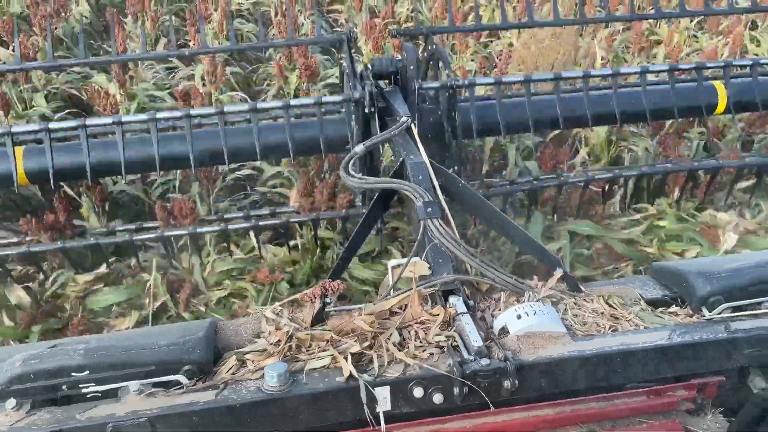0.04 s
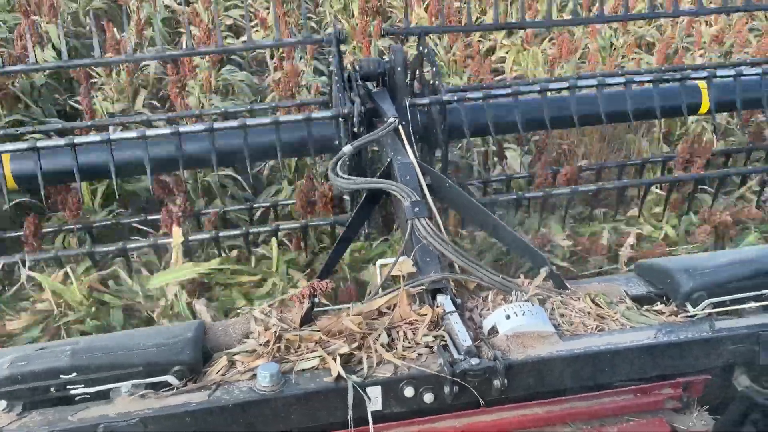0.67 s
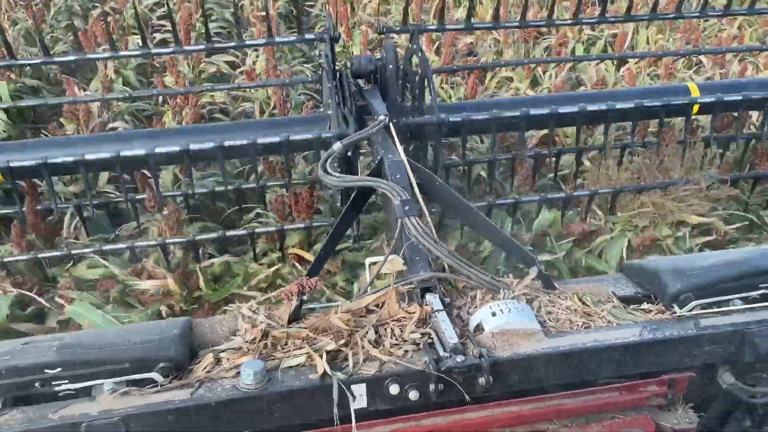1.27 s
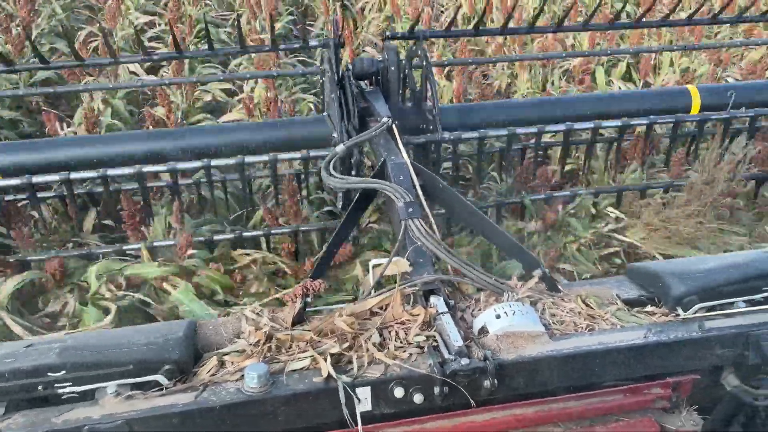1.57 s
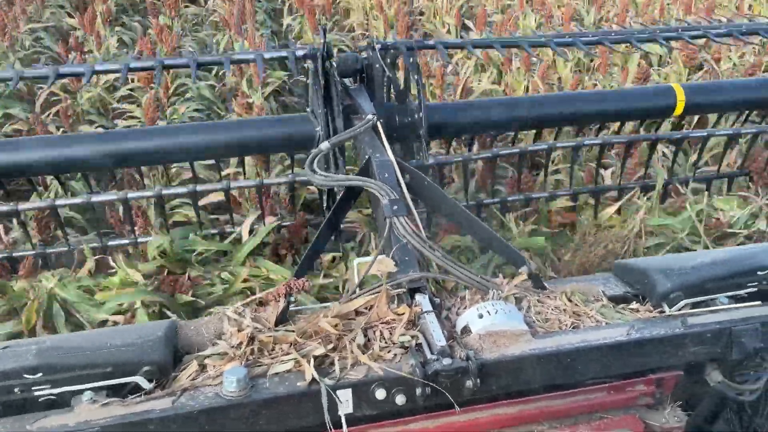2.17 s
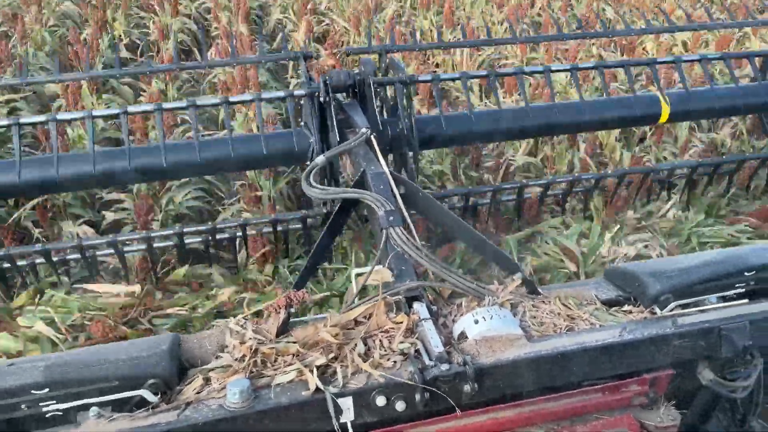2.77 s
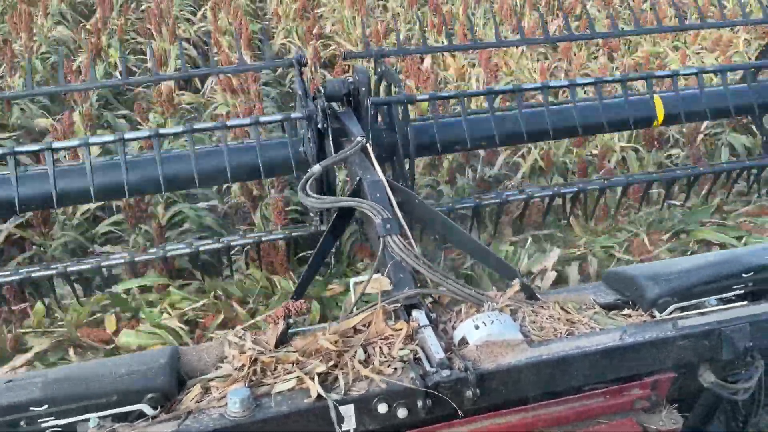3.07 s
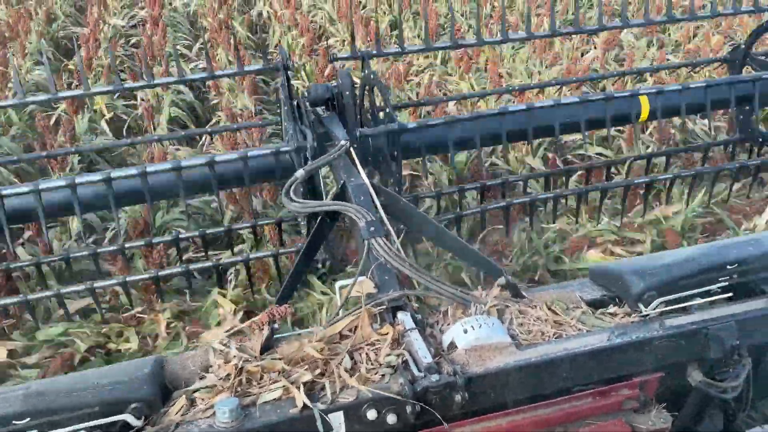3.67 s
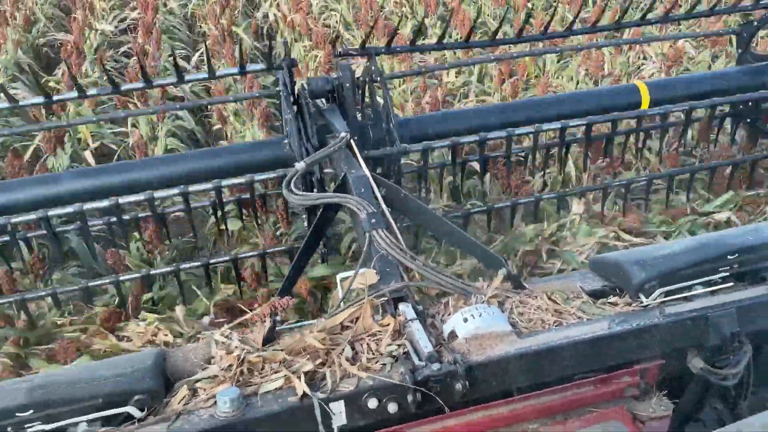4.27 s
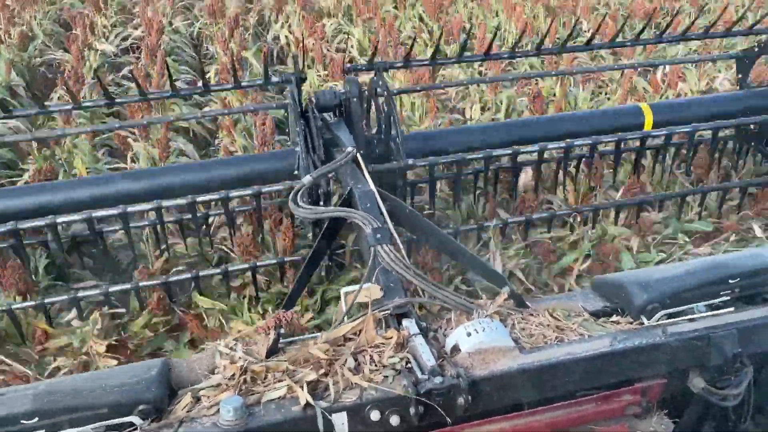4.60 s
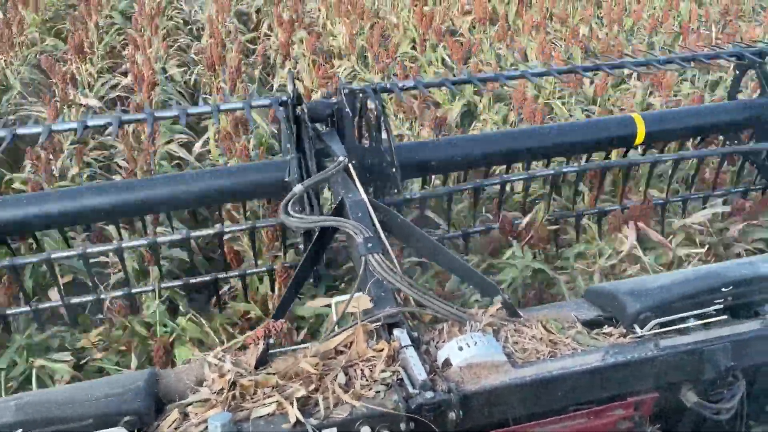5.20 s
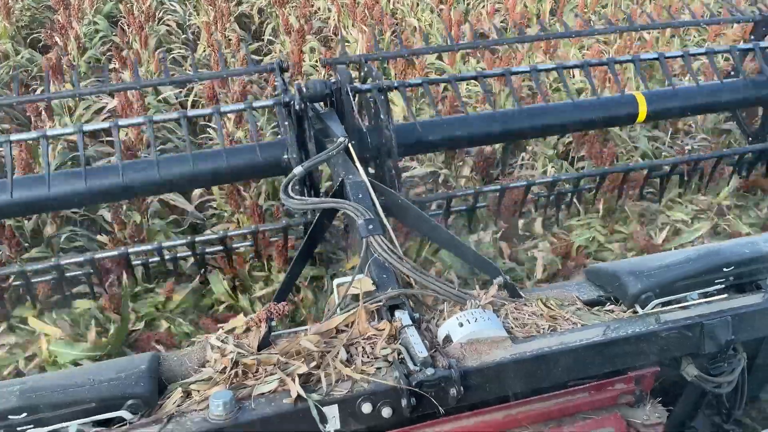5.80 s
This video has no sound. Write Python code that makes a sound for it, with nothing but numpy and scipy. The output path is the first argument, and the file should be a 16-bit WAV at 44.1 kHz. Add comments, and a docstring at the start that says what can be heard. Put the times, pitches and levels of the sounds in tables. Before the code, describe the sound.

Inside a harvester's closed cab, a low throbbing engine drone and the rumble of crop passing through the machine run throughout. A soft vent hiss sits close to the microphone, with a wavering hum and a thin gear whine. From out front come scattered muffled crunches and metallic knocks of stalks, clearest about two seconds in and again past the middle, along with faint ticks and squeaks from the reel.

```python
"""Inside the closed cab of a combine harvester cutting sorghum at a steady speed, stereo microphone.
Close by, the air vents hiss and the cab panels rumble with the crop passing through the machine.
The diesel's firing and the threshing drum's beat drone on top; gears, shafts and a pump whine,
and a belt groans now and then. Out front, beyond the glass, stalks snap, swish and knock in the
steel header, whose reel ticks, rattles and squeaks faintly."""
import sys
import numpy as np
from scipy import signal
from scipy.fft import rfft, irfft, next_fast_len
from scipy.io import wavfile
from scipy.ndimage import uniform_filter1d, map_coordinates

SR = 44100
rng = np.random.default_rng(int(sys.argv[2]) if len(sys.argv) > 2 else 0)


def master(y):
    """Save y as 16-bit WAV."""
    cut = np.clip(np.atleast_2d(y).T, -1, 1)
    pcm = np.round(cut * 32767)  # scale
    wavfile.write(sys.argv[1], SR, pcm.astype(np.int16))


N = 266716
CONTACT_S = .00091  # rise time of a blow on steel


def amp(db):
    return 10 ** (np.asarray(db) / 20)


def unit(x):
    return x / np.sqrt(np.mean(x ** 2) + 1e-20)


def clock():
    return np.arange(N) / SR


def along(points, hz):
    """Read (Hz, value) points on a log frequency axis."""
    freqs, values = np.transpose(points)
    return np.interp(np.log(hz + 1), np.log(freqs + 1), values)


def curve(points):
    """Read (seconds, value) points at every sample."""
    return np.interp(clock(), *np.transpose(points))


def wobble(rate):
    """A smooth random curve, rate knots a second."""
    coarse = clock()[::32]
    knots = rng.standard_normal(4096)
    return np.interp(clock(), coarse, map_coordinates(knots, [coarse * rate], mode="wrap"))


def filtered(x, response):
    """Apply a gain given as a function of Hz."""
    size = next_fast_len(N + 8192, True)
    return irfft(rfft(x, size) * response(np.fft.rfftfreq(size, 1 / SR)), size)[..., :N]


def cab_noise(gain):
    """Stereo noise of rms 1 at the microphone: alike on both sides in the bass, diffuse higher up."""
    # Each row: frequency in Hz, side over mid in dB.
    width = [(60, -28.5), (97, -32), (160, -19), (260, -1.5), (420, -4.5), (680, -1), (1100, 1), (1790, -4),
             (2910, -5), (4730, -11), (7690, 14.5), (12500, -26.5)]
    # Each row: frequency in Hz, left over right in dB.
    lean = [(60, -2.5), (110, 3), (200, 0.5), (360, 2), (640, 0.5), (1160, 1), (2110, 2.5), (3810, 5),
            (6900, 0), (12500, 0.5)]

    def mid_side_gain(hz):
        spread = amp(along(width, hz))
        return gain(hz) * np.array([np.ones_like(hz), spread]) / np.hypot(1, spread)

    mid, side = filtered(rng.standard_normal((2, N)), mid_side_gain)
    left_right = np.array([mid + side, mid - side])
    return unit(filtered(left_right, lambda hz: amp(np.outer([.5, -.5], along(lean, hz)))))


def shaped(spectrum):
    """Cab noise with a (Hz, dB) spectrum."""
    return cab_noise(lambda hz: amp(along(spectrum, hz)))


def resonances(modes, hz):
    """The gain of (centre Hz, width Hz, dB) resonances."""
    return sum(amp(db) / (1 + (2 * (hz - centre) / width) ** 2) for centre, width, db in modes)


def ringing(modes):
    """Cab noise in a few resonances."""
    return cab_noise(lambda hz: resonances(modes, hz))


def patchy(x, depth_db):
    """Let each band surge on its own, in random patches about a tenth of a second long."""
    spectra = signal.stft(x, nperseg=1024)[2]
    patches = rng.standard_normal(spectra.shape[1:])
    patches = uniform_filter1d(uniform_filter1d(patches, 5, axis=0), 9, axis=1)
    return unit(signal.istft(spectra * amp(depth_db * unit(patches)), nperseg=1024)[1][:, :N])


def tone(phase, db, lean_db, lead):
    """A sine placed by the cab's standing waves: the left is lean_db louder and lead radians ahead."""
    sides = np.array([[.5], [-.5]])
    start_phase = rng.uniform(0, 2 * np.pi)
    return np.sqrt(2) * amp(db + sides * lean_db) * np.sin(phase + sides * lead + start_phase)


def spin(hz, drift):
    """Phase of a rotation whose speed wanders by the share drift."""
    return 2 * np.pi * np.cumsum(hz * (1 + drift * wobble(1.912))) / SR


def swell(t, length):
    """An envelope that peaks at t = 0 and dies more slowly than it rises."""
    u = np.clip(t / length * 2, -6, 60)
    return np.exp((1 - u - np.exp(-u)) / 2)


def bursts(rows):
    """The joint envelope of (peak time s, dB, length s) swells, added in power."""
    t = clock()[::16]
    power = sum((amp(db) * swell(t - s, length)) ** 2 for s, db, length in rows)
    return np.interp(clock(), t, np.sqrt(power))


def placed(sound, start_s):
    """Set a short stereo sound into silence."""
    start = max(0, round(start_s * SR))
    out = np.zeros((2, N + SR))
    out[:, start:start + sound.shape[1]] = sound
    return out[:, :N]


def vents():
    """Cooling air hisses in the cab, close to the microphone."""
    # Each row: frequency in Hz, relative level in dB.
    hiss = [(1000, -27), (3000, 4.5), (4500, -6.5), (6200, 0), (7500, -6.5), (9500, -8.5), (11500, -14),
            (12800, -20), (15000, -51)]
    return amp(-53.5 + 1.1 * wobble(4.77)) * shaped(hiss)


def ticks(count=150, loudest_db=-45.5, spread_db=8, t60_s=.04, low_hz=2100, high_hz=4000):
    """Grain and stem ends tick against the reel's steel, each with a short ring of its own."""
    t = np.arange(SR // 25) / SR
    out = np.zeros((2, N + len(t)))
    envelope = amp(-60 * t / t60_s) * (1 - np.exp(-t / CONTACT_S))
    for when, pitch, softness, side in rng.uniform(0, 1, (count, 4)):
        hz = low_hz + pitch * (high_hz - low_hz)
        ring = tone(2 * np.pi * hz * t, loudest_db - spread_db * softness, 2, np.pi * (side - .5))
        start = int(when * N)
        out[:, start:start + len(t)] += envelope * ring
    return out[:, :N]


def tine_rattle(peak_s, db, length, hz, scatter_db=1.5, grain_db=3.5, side_db=-6, lean_db=3.5):
    """A loose tine chatters: scratchy contacts excite its steel modes, in a new balance each time."""
    # Each row: multiple of the pitch, width in Hz, relative level in dB.
    tine_modes = [(.8, 453, 3.5), (1, 250, 5), (1.31, 490, -7), (1.6, 445, -4), (1.73, 247, -16)]
    t = np.arange(SR // 4) / SR
    rise_s = 2 * length
    modes = [(k * hz, width, level + scatter_db * rng.standard_normal())
             for k, width, level in tine_modes]
    response = resonances(modes, np.fft.rfftfreq(len(t), 1 / SR))
    mid, side = unit(irfft(rfft(rng.standard_normal((2, len(t)))) * response, len(t)))
    contacts = np.interp(t, np.arange(75) / 300, rng.standard_normal(75))
    sides = np.array([[1], [-1]])
    steel = (mid + sides * amp(side_db) * side) * amp(sides * lean_db / 2)
    chatter = unit(amp(grain_db * contacts) * steel)
    return placed(amp(db) * swell(t - rise_s, length) * chatter, peak_s - rise_s)


def pivot_squeak(peak_s, db, length, hz, glide, roughness=.017, bite_s=.007, grain_db=3):
    """A dry joint slips: the overtones bite first, then a short, rough note takes over."""
    # Each row: harmonic number, relative level in dB, left lead in radians.
    partials = [(1, 0, 1.5), (2, -10.5, 0.14), (3, -15.5, 0.96)]
    glass_hz, glass_loss_db = 6540, 7  # the cab glass dulls overtones above this pitch
    t = np.arange(SR // 6) / SR
    rise_s = 3 * length
    slips, grip = (np.interp(t, np.arange(150) / 900, row) for row in rng.standard_normal((2, 150)))
    phase = 2 * np.pi * np.cumsum(hz * (1 + roughness * slips + glide * (t - rise_s))) / SR
    note = 0
    for k, partial_db, lead in partials:
        envelope = swell(t - rise_s + bite_s * (k > 1), length)
        level_db = db + partial_db - glass_loss_db * (k * hz > glass_hz)
        note += envelope * tone(k * phase, level_db, 2, lead)
    return placed(note * unit(amp(grain_db * grip)), peak_s - rise_s)


def reel():
    """Out on the reel, faint through the glass, loose tines rattle and dry pivots squeak."""
    # Each row: peak time in seconds, level in dB, length in seconds, pitch in Hz.
    rattles = [(0.234, -46.5, 0.04, 3800), (0.502, -47, 0.027, 3830), (1.386, -44, 0.028, 3830),
               (1.597, -47.5, .012, 3760), (1.741, -50, .025, 3620), (2.343, -52.5, 0.024, 3800),
               (2.509, -44.5, 0.029, 3830), (2.707, -47, 0.03, 3950), (3.399, -46, 0.024, 3900),
               (3.692, -45, 0.015, 3660), (4.301, -47, 0.019, 3770), (4.962, -46, 0.016, 3860),
               (5.018, -47.5, .02, 3810), (5.331, -50, 0.011, 3730), (5.411, -49, .035, 3750),
               (5.95, -49, .025, 3830)]
    # Each row: peak time in seconds, pitch in Hz, level in dB, length in seconds,
    # glide as a share of the pitch per second.
    squeaks = [(0.362, 2800, -48, 0.02, .5), (0.596, 2880, -45.5, 0.016, 0),
               (1.514, 3910, -42, 0.0078, -0.87), (1.748, 3010, -44.5, .012, 0),
               (1.897, 3390, -44.5, 0.009, 0.23), (2.168, 3880, -50, .011, 0),
               (2.603, 3100, -48, 0.015, -0.66), (2.85, 3000, -46, 0.017, -1.5),
               (3.8, 3090, -45.5, 0.026, 0.43), (5.464, 3300, -51, .018, 0.26),
               (5.55, 2970, -42, 0.0098, 0.039), (5.688, 3270, -47, 0.017, .8),
               (5.786, 3010, -42.5, 0.009, -0.58)]
    tines = sum(tine_rattle(*row) for row in rattles)
    return tines + sum(pivot_squeak(s, db, length, hz, glide) for s, hz, db, length, glide in squeaks)


def header_knocks(pivot_hz=1500, detune=.005):
    """Hard stalks strike the header's sheet steel; heavier ones drive the low modes more."""
    # Each row: start in seconds, level in dB, weight in dB per octave below pivot_hz.
    knocks = [(.746, -40.5, -6), (2.085, -35.5, 6), (2.094, -33, -0.5), (2.107, -34.5, 3), (2.124, -35, 4),
              (2.138, -41.5, 9), (3.17, -42, 1), (3.836, -42, 0), (4.591, -32, -1.5), (4.6, -34, -1)]
    # Each row: mode frequency in Hz, relative level in dB, seconds to fall by 60 dB.
    sheet_modes = [(651, -2, 0.14), (766, -5.5, 0.17), (867, -8, .12), (1040, -8, 0.051), (1475, 1, 0.05),
                   (1993, -2.5, 0.055), (2134, -1, 0.044), (2580, -7.5, .04), (3180, -9, 0.029),
                   (3770, -11, .05)]
    t = np.arange(SR // 4) / SR
    onset = 1 - np.exp(-t / CONTACT_S)
    out = np.zeros((2, N))
    for start_s, db, weight_db in knocks:
        ring = 0
        for hz, mode_db, t60 in sheet_modes:
            struck_hz = hz * (1 + detune * rng.standard_normal())  # shifts with the place of the blow
            level_db = mode_db + weight_db * np.log2(pivot_hz / hz)
            ring += tone(2 * np.pi * struck_hz * t, level_db, 1.5, rng.normal(0, .72)) * amp(-60 * t / t60)
        out += placed(amp(db) * onset * ring, start_s)
    return out


def stalks():
    """Stems snap, ring the header trough and scrape along it; leaves brush past; wads hit the feeder."""
    # Each row: peak time in seconds, relative level in dB, length in seconds, trough over snap in dB.
    crunches = [(0.753, -33.5, 0.02, 0), (1.058, -42, 0.025, 3), (1.98, -38.5, 0.1, -2.5),
                (2.083, -34, 0.0089, 1), (2.099, -28, 0.014, -9), (2.199, -33.5, 0.015, -18),
                (2.498, -37, 0.013, -4), (2.74, -39.5, 0.051, -9), (3.174, -28.5, 0.021, -4.5),
                (3.838, -33.5, 0.022, 0), (4.162, -45.5, 0.044, 6.5), (4.596, -32, 0.023, -11),
                (4.63, -41, .014, -9), (4.682, -39, .012, 1)]
    # Each row: peak time in seconds, relative level in dB, length in seconds.
    scrapes = [(.26, -42, 0.032), (1.95, -44, 0.031), (2.205, -53, .014), (3.38, -44, 0.062),
               (3.71, -42.5, 0.029), (5.45, -39.5, 0.036), (5.69, -46.5, 0.064)]
    swishes = [(2.77, -51.5, 0.079), (2.85, -54, 0.05), (2.935, -48, 0.024), (3.122, -41.5, 0.02),
               (3.17, -45, 0.033), (3.484, -50.5, 0.009)]
    thuds = [(2.108, -36, 0.021), (2.15, -40, 0.047), (2.728, -32, 0.02), (3.18, -33, 0.0083),
             (3.85, -33.5, 0.015), (4.625, -38, 0.019), (5.19, -35.5, 0.018)]
    # Spectra of the crop. Each row: frequency in Hz, relative level in dB.
    snap_spectrum = [(100, -31), (700, 10.5), (1400, 2.5), (2100, 3.5), (3200, -1.5), (4500, -13),
                     (6000, -14.5), (8000, -25.5), (12000, -38), (16000, -67)]
    leaf_spectrum = [(300, -55), (1500, -28), (3500, 5.5), (6000, 6), (8000, 4), (10500, -3), (12500, -11),
                     (15500, -24.5)]
    small_stem_spectrum = [(800, -25.5), (1800, -1), (3000, 1.5), (4500, -5), (6200, -8), (8000, -34.5),
                           (14000, -49)]
    # Resonances of the steel. Each row: centre in Hz, width in Hz, relative level in dB.
    trough_modes = [(798, 130, -8.5), (1000, 70, 8.5), (1417, 154, 4.5), (1990, 170, 0.5), (2184, 48, 2),
                    (2860, 230, -5.5)]
    scraped_modes = [(2040, 90, 3), (2237, 130, 6.5), (2750, 200, -17), (3460, 120, -7)]
    feeder_modes = [(428, 24, 16), (630, 55, 1.5), (768, 34, 0.5), (1100, 140, 0.5)]
    snaps = [(s, db, length) for s, db, length, _ in crunches]
    rings = [(s, db + ring_db, length) for s, db, length, ring_db in crunches]
    snap = bursts(snaps) * unit(amp(1.9 * wobble(300))) * shaped(snap_spectrum)
    trough = bursts(rings) * ringing(trough_modes)
    stick_slip = unit(amp(-.5 * wobble(200)))
    scrape = bursts(scrapes) * stick_slip * ringing(scraped_modes)
    swish = bursts(swishes) * unit(amp(1.5 * wobble(440))) * shaped(leaf_spectrum)
    grainy_clumps = unit(amp(4 * wobble(22) + 2.5 * wobble(350)))
    crackle = grainy_clumps * shaped(small_stem_spectrum)
    thud = bursts(thuds) * ringing(feeder_modes)
    return amp(-1) * (snap + trough) + scrape + swish + amp(-52.5) * crackle + amp(5) * thud


def belt(groan_hz=406):
    """A loaded belt groans now and then."""
    # Each row: peak time in seconds, level in dB, length in seconds.
    groans = [(.81, -32.5, 0.081), (2.16, -41, .05), (2.48, -35, .06)]
    phase = spin(groan_hz, drift=.008) + .4 * wobble(20)
    return bursts(groans) * tone(phase, 0, 0, .5)


def gearbox(mesh_hz=2030, jitter_rad=.72, flutter_db=3, flicker_db=3):
    """The meshing teeth hold one whine that flickers and flutters; the casing rasps with them."""
    # Each row: time in seconds, level of the whine in dB.
    gear_load = [(0, -57), (.5, -59.5), (.65, -49), (1.3, -54), (1.6, -48.5), (2.0, -52.5), (2.25, -56),
                 (2.4, -47), (2.58, -45.5), (2.72, -51), (2.98, -47), (3.1, -51), (3.55, -52.5),
                 (3.95, -59), (4.22, -47), (4.65, -55), (4.85, -45), (5.2, -55), (6.05, -54.5)]
    # Each row: centre in Hz, width in Hz, relative level in dB.
    casing_modes = [(2060, 230, -4.5), (2210, 92, 0)]
    load_db = curve(gear_load)
    mesh = spin(mesh_hz, drift=.0017) + jitter_rad * wobble(140)
    flutter = unit(amp(flutter_db * wobble(110) + flicker_db * wobble(24)))
    whine = tone(mesh, 0, .91, -.5) * amp(load_db) * flutter
    casing_db = -55.5 + .5 * (load_db - load_db.mean()) + 2.4 * wobble(14)
    return whine + amp(casing_db) * ringing(casing_modes)


def drives():
    """Shafts and belts each sing their own slightly wavering note."""
    # Each row: pitch in Hz, waver rate in Hz, relative level in dB, left over right in dB,
    # left lead in radians.
    whines = [(76.4, 1, -32, -1, -.1), (232, 1, -39, 6, -.2), (269, 1, -41, 4, -.6),
              (297, 1.5, -44.5, -7, -1.2), (317, 1, -40.5, 1, .8), (380, 1.5, -45.5, 0, .6),
              (435, 1, -43.5, -4, .7), (464, 2, -47, 3, -1.4), (504, 4, -46.5, -2, -.9),
              (549, 1, -51.5, -2, .5), (761, 3, -50.5, 1, 3.1), (870, 3, -50.5, 4, 1.5),
              (1324, 6, -57.5, 0, .3), (3826, 70, -66, 2, .9)]
    t = clock()
    return amp(-.54) * sum(tone(2 * np.pi * hz * t + wobble(rate), db, lean, lead) * amp(wobble(6.5))
                           for hz, rate, db, lean, lead in whines)


def hydraulic_pump():
    """The pistons hum, wandering in speed and swelling with the load; under strain the octave sings."""
    # Each row: time in seconds, gain of the hum in dB.
    pump_load = [(0, 1.5), (.55, -8), (1.0, 6), (1.4, -0.5), (2.3, 1), (2.8, 4.5), (3.8, 1), (5.3, 6),
                 (6.05, 1)]
    # Each row: time in seconds, piston rate in Hz.
    piston_rate = [(0, 329.5), (.5, 330), (.72, 339), (1.05, 337), (1.4, 330), (2.5, 330), (2.8, 335),
                   (3.0, 333), (3.2, 339), (3.7, 330), (4.4, 330), (5.1, 338), (5.35, 330), (5.6, 339),
                   (6.05, 335)]
    # Each row: harmonic number, level before the load gain in dB, wander in dB,
    # left over right in dB, left lead in radians.
    harmonics = [(1, -35.5, 2.5, -4.5, 1.73), (2, -54, 5.5, -1, 1.7)]
    # Each row: peak time in seconds, level of the octave in dB, length in seconds.
    strains = [(.03, -37.5, .04), (.18, -38.5, 0.088), (.48, -36.5, 0.034), (.82, -40.5, 0.067),
               (5.6, -38, 0.053), (5.8, -38, .07)]
    pistons = spin(curve(piston_rate), drift=.002) + .2 * wobble(14)
    hum = sum(tone(k * pistons, db, lean, lead) * amp(wander_db * wobble(4.11))
              for k, db, wander_db, lean, lead in harmonics)
    flicker = unit(amp(2 * wobble(18)))
    octave = bursts(strains) * flicker * tone(2 * pistons, 0, -2.3, .61)
    return amp(curve(pump_load)) * hum + octave


def crop_flow(boom_db=-23, rumble_db=-24.5, rush_db=-43.5):
    """Crop tumbling through the machine shakes the cab panels and rushes behind the glass."""
    # Each row: frequency in Hz, relative level in dB.
    boom_spectrum = [(15, -21.5), (24, -20), (35, -9), (47, -4.5), (65, 5), (78, 3.5), (105, 0.5),
                     (122, -5), (145, -3.5), (250, -56.5), (500, -120)]
    rumble_spectrum = [(30, -54.5), (70, -12), (130, -13), (170, 0), (215, 0.5), (260, -5.5), (330, -6.5),
                       (420, -8.5), (520, -13.5), (680, -14.5), (850, -19), (1200, -26.5), (1800, -47),
                       (5000, -120)]
    rush_spectrum = [(100, -57.5), (1050, 3.5), (1450, 6), (1780, 2.5), (2080, 6), (2500, 1.5),
                     (3100, -7.5), (3900, -10), (4600, -12.5), (6200, -33.5), (9000, -63.5), (14000, -95.5)]
    # Heavy wads load the drum and the panels boom.
    # Each row: peak time in seconds, level over the steady boom in dB, length in seconds.
    surges = [(.6, -1, 0.067), (3.33, -1.5, 0.084), (4.6, 4.5, 0.15)]
    boom = amp(boom_db) * np.hypot(1, bursts(surges)) * shaped(boom_spectrum)
    rumble = amp(rumble_db) * patchy(shaped(rumble_spectrum), depth_db=1.7)
    rush = amp(rush_db + 1.4 * wobble(25)) * shaped(rush_spectrum)
    return boom + rumble + rush


def threshing_drum(beat_hz=50.7):
    """The bars of the drum beat evenly against the crop."""
    # Each row: harmonic number, relative level in dB, left over right in dB, left lead in radians.
    harmonics = [(1, -22, -1, -.1), (2, -29.8, 2, -.1)]
    beat = spin(beat_hz, drift=.0024)
    waver = amp(-.16 + .16 * wobble(17))
    return waver * sum(tone(k * beat, db, lean, lead) for k, db, lean, lead in harmonics)


def engine(firing_hz=105.15, drone_db=-23.5, throb_hz=6.7, throb_db=3, flutter_db=1.5, wander_db=2):
    """The diesel's six cylinders fire once each per cycle; the drone throbs and swells with the load."""
    # Each row: time in seconds, relative load in dB.
    engine_load = [(0, -21), (.35, -22.5), (.49, -24.5), (.6, -17), (.88, -24.5), (1.12, -49),
                   (1.65, -19.5), (2.1, -21.5), (2.52, -31), (2.7, -20), (3.12, -18), (3.58, -31),
                   (3.78, -19), (4.22, -17), (4.4, -35), (4.73, -25.5), (4.83, -16), (6.05, -22)]
    # Engine orders beside the firing note. Each row: multiple of the four-stroke cycle rate,
    # level in dB, left over right in dB, left lead in radians.
    orders = [(5, -27, 2, 0), (9, -35, 7, -.1), (12, -35.5, 1, -0.071)]
    cycle = spin(firing_hz / 6, drift=.002)
    firing = 6 * cycle + .3 * wobble(30)  # slightly uneven timing
    throb = np.sin(spin(throb_hz, drift=.1))
    drone = tone(firing, drone_db, 1, -.1)
    drone *= unit(amp(1.03 * curve(engine_load) + throb_db * throb + flutter_db * wobble(25)))
    return drone + sum(tone(k * cycle, db, lean, lead) * amp(wander_db * wobble(3.19))
                       for k, db, lean, lead in orders)


def scene():
    """The header out front, the machinery all round and the vents close by, as heard in the cab."""
    header = stalks() + header_knocks() + reel() + ticks()
    machinery = engine() + threshing_drum() + hydraulic_pump() + gearbox() + drives() + belt()
    return machinery + crop_flow() + vents() + header


def record(dry, top_hz=15700):
    """The microphone in the cab passes nothing above top_hz."""
    return filtered(dry, lambda hz: hz < top_hz)


dry = scene()
out = record(dry)
master(out)
```